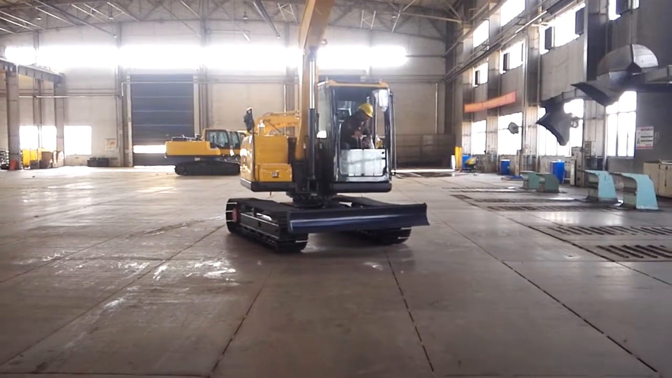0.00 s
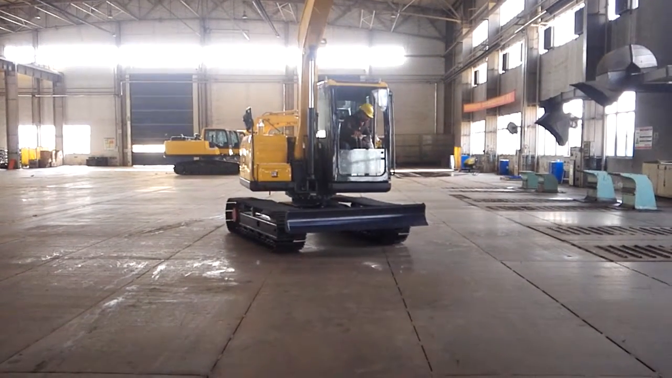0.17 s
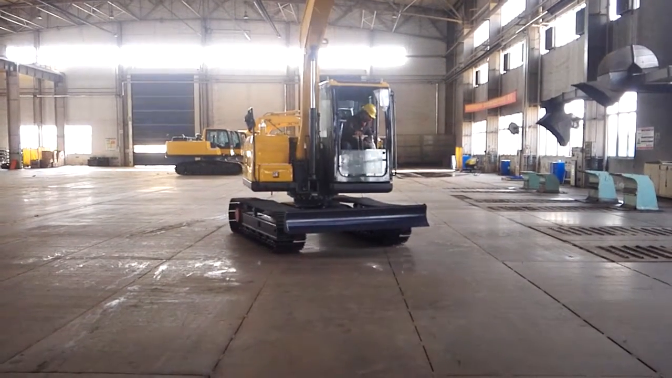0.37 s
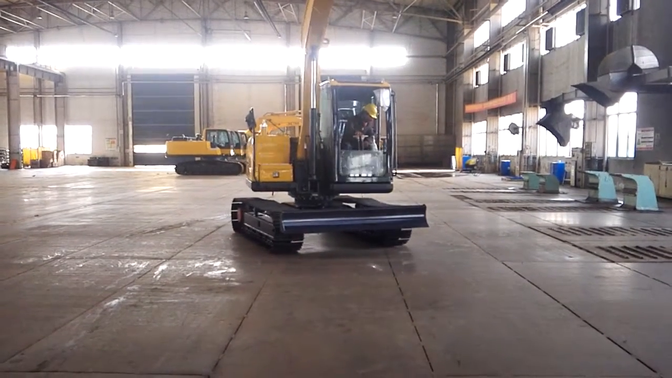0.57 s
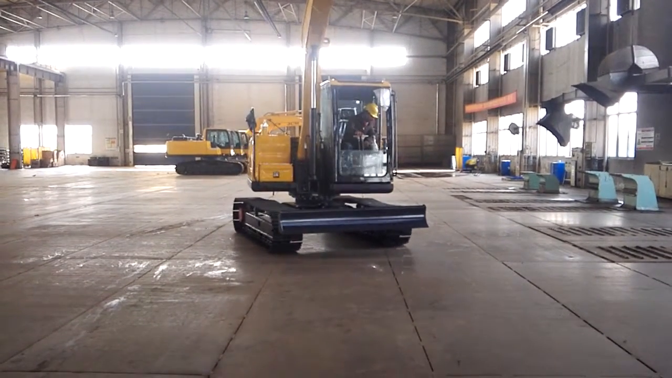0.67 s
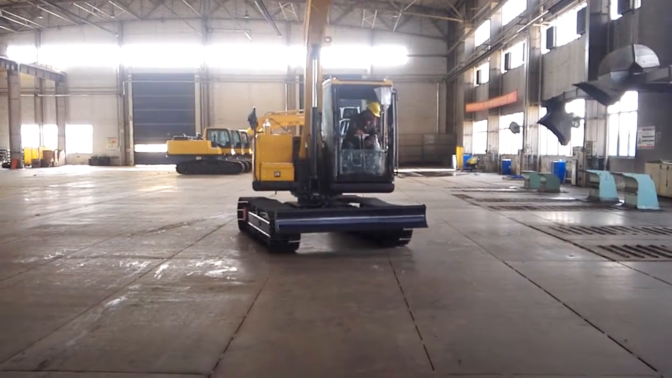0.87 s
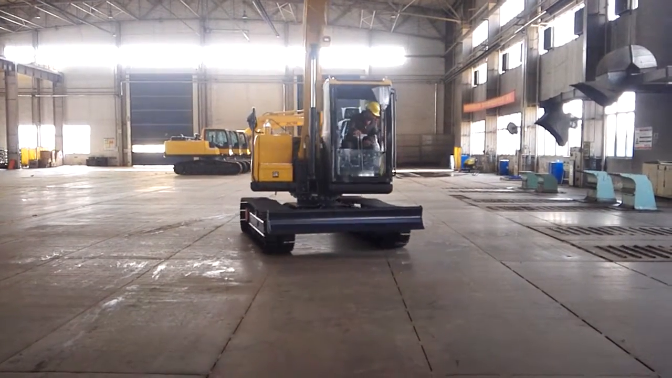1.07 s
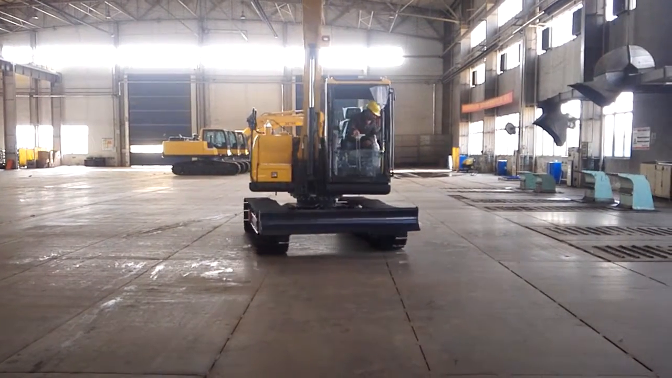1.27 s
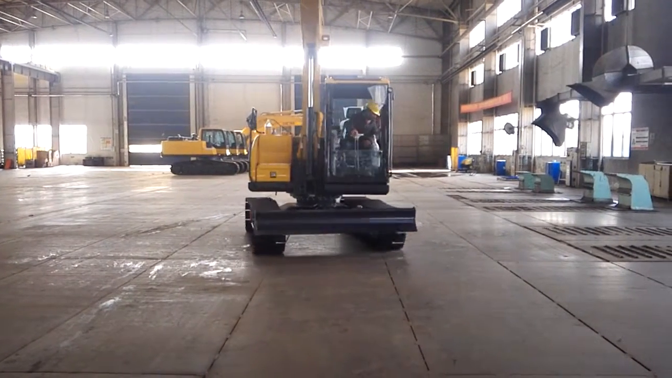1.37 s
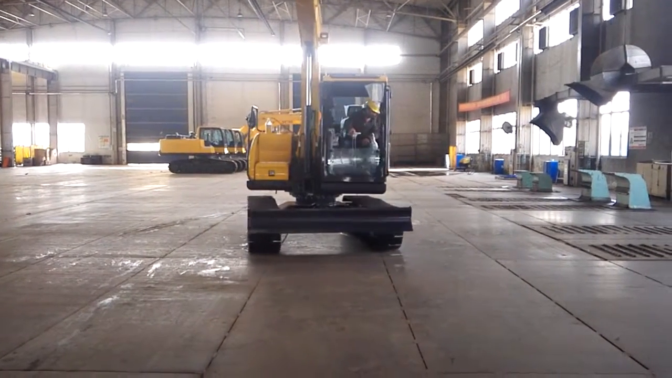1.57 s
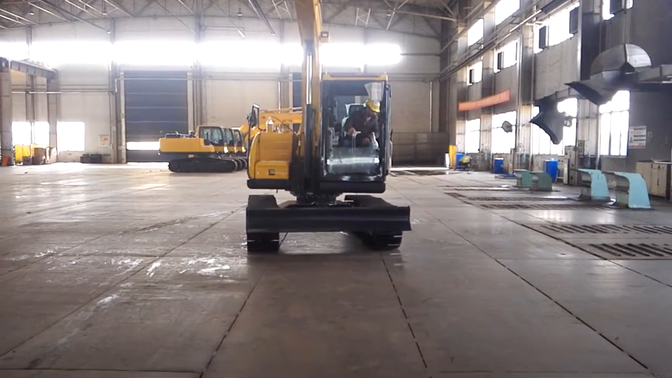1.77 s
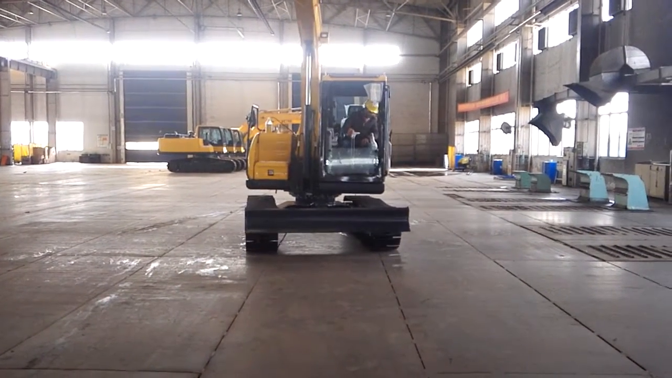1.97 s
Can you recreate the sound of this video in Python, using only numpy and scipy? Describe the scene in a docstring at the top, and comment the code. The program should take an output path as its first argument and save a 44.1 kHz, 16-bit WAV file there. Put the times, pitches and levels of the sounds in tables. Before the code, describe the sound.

Excavator track shoes clank on concrete in a large hall. A faint tick at 0.18 s leads to hard, bright, rattling blows from 0.24 s, loudest near 0.43 and 0.84 s, each chirping downward and ringing. Scraping peaks around 0.5 s, with brief low groans. Weaker clanks continue to 1.5 s, a lighter scrape near 1.3 s; then engine hum, whirr, rumble and echo subside until 2 s.

```python
"""Steel track shoes clank on the concrete floor of a large hall as a small diesel excavator turns.
Each blow is filtered noise whose treble arrives ahead of the mids, so it chirps down, rattles and rings.
Tracks scrape (noise) and the drive groans (a gliding sine); both fade as the engine tones and whirr ease.
Under them lie a rumble and a deep boom. The tracks stand ahead of the hall's diffuse tail,
and the stereo microphone overloads on the loudest peaks."""
import sys
import numpy as np
from scipy import signal
from scipy.fft import rfft, irfft, next_fast_len
from scipy.io import wavfile
from scipy.ndimage import map_coordinates

SR = 44100
rng = np.random.default_rng(int(sys.argv[2]) if len(sys.argv) > 2 else 0)


def unload_audio(sound):
    """Save the sound as a 16-bit wav file, at the path given as the first command line argument."""
    columns = np.transpose(np.atleast_2d(sound))
    # keep every value between -1 and 1, then stretch to whole-number steps
    steps = np.round(np.clip(columns, -1, 1) * 32767)
    wavfile.write(sys.argv[1], SR, steps.astype(np.int16))


N = 88200  # samples: two seconds


def amp(db):
    """Decibels to gain."""
    return 10 ** (np.asarray(db) / 20)


def unit(x):
    """Scale to rms 1."""
    return x / np.sqrt(np.mean(x ** 2) + 1e-20)


def along(points, hz):
    """Read (freq_hz, value) points on a log frequency axis."""
    freq, value = np.transpose(points)
    return np.interp(np.log(hz + 1), np.log(freq + 1), value)


def curve(rows):
    """Read (time_s, value) points, one value per sample."""
    return np.interp(np.arange(N) / SR, *np.transpose(rows))


def wobble(rate, n=N):
    """A smooth random curve around zero, rate knots a second."""
    knots = rng.standard_normal(4000)
    return map_coordinates(knots, [np.arange(n) * rate / SR + 2], mode="wrap")


def filtered(x, response):
    """Multiply the spectrum of x by a complex response of frequency."""
    n = x.shape[-1]
    padded = next_fast_len(n + SR // 10, True)
    return irfft(rfft(x, padded) * response(np.fft.rfftfreq(padded, 1 / SR)), padded)[..., :n]


# likeness of the two microphone channels: freq_hz, correlation
LIKENESS = [(60, 0.97), (190, 1), (370, .6), (700, 0.24), (1200, 0.24), (2200, 0.087), (4000, 0.14),
            (8000, -0.15)]


def spread(pair):
    """Play a pair as mid and side: left and right are most alike in the bass."""
    def mid_side_gains(hz):
        turn = np.arccos(np.clip(along(LIKENESS, hz), -1, 1)) / 2
        return np.array([np.cos(turn), np.sin(turn)])

    mid, side = filtered(pair, mid_side_gains)
    return np.array([mid + side, mid - side])


def rush(spectrum):
    """Stereo noise of rms 1, coloured by a (freq_hz, level_db per Hz) table."""
    noise = rng.standard_normal((2, N))
    return unit(spread(filtered(noise, lambda hz: amp(along(spectrum, hz)))))


# track shoes striking the floor: start_s, level_db, body_db (low), mids_db (upper mids), top_db (treble),
# knock_db, hold_s (rattle), t60_s (rattle), travel_s (of a 1 kHz wave), mid_over_side_db
BLOWS = [(0.179, -40, 13, 7.5, -6, -27, 0.034, 0.16, 0.022, 1.5),
         (0.2397, -9.5, -2, 0, 3, -15.5, .017, 0.16, 0.017, 0.5),
         (0.3198, -12, -1, 2, 0.5, -33, .02, 0.2, 0.016, -1),
         (0.429, -3.5, -3, -1, 6, -12.5, 0.016, 0.2, .022, -1),
         (0.491, -18, -3, 1.5, -2, -24.5, 0.054, 0.17, 0.019, 2),
         (0.653, -14, -3.5, -0.5, 5.5, -21, .02, 0.3, 0.02, 0),
         (.686, -13.5, 1.5, 1, 1, -21.5, 0.022, 0.37, 0.017, 1.5),
         (.801, -15.5, -2, 2.5, 2.5, -20, 0.027, 0.23, .019, 1.5),
         (0.842, -6, -9.5, -4, 3, -10.5, .025, 0.13, .029, 1.5),
         (0.954, -21, -12, 4, 2, -30, 0.018, 0.065, 0.015, -1.5),
         (0.998, -26, 1, -15, 0, -3, 0.0098, 0.119, 0.019, 1),
         (1.108, -17.5, -4, 1, 2, -29, 0.0177, 0.21, .018, -2),
         (1.149, -13.5, -2, 0, 2.5, -7.5, 0.017, 0.33, .022, 1),
         (1.256, -21, -10, 0.5, 0.5, -27.5, 0.021, 0.13, .02, 0),
         (1.308, -21, -1.5, -2.5, -1, -22, .016, 0.19, .02, 0.5),
         (1.38, -35, 2.5, -4.5, -3, -25, 0.031, 0.13, 0.019, -2),
         (1.503, -31.5, -1.5, 2, -3.5, -20, 0.024, 0.19, .02, -0.5)]
# colour of the track steel, heard in blows and scrape: freq_hz, level_db (per Hz, relative)
STEEL_COLOUR = [(40, -41), (150, -7), (400, -15.5), (560, -4.5), (760, 0), (930, -7.5), (1150, -0.5),
                (1600, -0.5), (2150, 0), (2900, -2.5), (4200, 0.5), (5100, 1), (7000, -3.5), (9500, -11),
                (11400, -22.5), (13200, -22), (14500, -52)]
# colour of a blow's knock, a short soft-edged burst in the mids: freq_hz, level_db (per Hz, relative)
KNOCK_COLOUR = [(200, -28), (450, -11.5), (750, 4), (1200, 5), (1700, -9.5), (3000, -4), (8000, -53.5)]
# where the steel lies between the two channels: freq_hz, left_over_right_db
STEEL_BALANCE = [(500, -0.5), (2200, -1.4), (4200, 3), (5500, -2.5), (7500, -4.5), (10000, 0), (12000, 0)]
STRIKE_DB, RING_DB = -12, -20
SHIMMER_DB, SHIMMER_T60_S = -17, 0.5
SAME_SHARE = 0.39  # share of rattle power that all blows have in common
FRONT_DB, FRONT_S = 0.5, 0.017  # extra level at the onset and its decay time
CLATTER_DB, CLATTER_RATE = 1.6, 260  # unevenness at the onset, knots a second
KNOCK_RISE_S, KNOCK_T60_S = 0.007, 0.061


def clanks():
    """Each blow is a strike with a soft-edged knock, a short uneven rattle and the ring of the steel."""
    n = SR // 2
    t = np.arange(n) / SR
    out = np.zeros((2, N + n))  # mid and side until spread
    common = echoes(n)
    shimmer = rng.standard_normal((2, n)) * amp(SHIMMER_DB - 60 * t / SHIMMER_T60_S)
    front = np.exp(-t / FRONT_S)
    halves = np.array([[0.5], [-0.5]])  # split a balance between two channels
    for start, db, body_db, mids_db, top_db, knock_db, hold, t60, travel, mid_over_side_db in BLOWS:
        rattle = np.sqrt(SAME_SHARE) * common + np.sqrt(1 - SAME_SHARE) * echoes(n)
        onset_db = front * (FRONT_DB - CLATTER_DB * wobble(CLATTER_RATE, n))
        rattle = rattle * amp(onset_db - 60 * np.maximum(t - hold, 0) / t60)
        size = np.linalg.norm(rattle[0])
        strike = amp(STRIKE_DB) * size * np.array([[1], [0.3]]) * (t == 0)
        tilt = [(900, body_db), (2300, mids_db), (5000, 0.0019), (10000, top_db)]

        def through_steel(hz):
            colour = unit(amp(along(STEEL_COLOUR, hz)) * ripple(hz))
            return colour * amp(along(tilt, hz)) * bending(hz, travel)

        blow = filtered(rattle + shimmer + strike, through_steel)
        burst = (1 - np.exp(-t / KNOCK_RISE_S)) * amp(-60 * t / KNOCK_T60_S)
        knock = filtered(rng.standard_normal((2, n)) * burst,
                         lambda hz: amp(along(KNOCK_COLOUR, hz)) * bending(hz, travel))
        blow += amp(knock_db) * size * knock / np.linalg.norm(knock[0])
        blow += amp(RING_DB) * ring(t)
        first = round(start * SR)
        out[:, first:first + n] += amp(db + mid_over_side_db * halves) * blow
    return filtered(spread(out[:, :N]), lambda hz: amp(halves * along(STEEL_BALANCE, hz)))


def echoes(n, rate=600):
    """Waves bouncing about in the track: sparse strong returns, rate a second, in a dense wash."""
    sparse = (rng.random((2, n)) < rate / SR) * rng.choice([-1, 1], (2, n))
    return unit(unit(sparse) + 0.71 * rng.standard_normal((2, n)))


FASTEST_HZ, SLOWEST_HZ = 8424, 547.4  # travel time stays constant beyond these


def bending(hz, travel):
    """Phase of a bending wave in steel: its travel time falls with the root of frequency."""
    slowness = np.sqrt(1000 / np.clip(hz, SLOWEST_HZ, FASTEST_HZ))
    delay = travel * (slowness - np.sqrt(1000 / FASTEST_HZ))  # behind the fastest wave
    return np.exp(-2j * np.pi * np.cumsum(delay) * hz[1])  # phase is the sum of delay over frequency


def ripple(hz, depth_db=1.0, spacing_hz=200):
    """Random peaks and dips give every blow its own colour."""
    peaks = rng.standard_normal(256)
    return amp(depth_db * np.interp(hz / spacing_hz, np.arange(256), peaks))


# ringing modes of the track: freq_hz, level_db (before the random change per blow), t60_s
TRACK_MODES = [(727, -10, .55), (1098, -4, .4), (2060, -3, .35), (2166, -3, .35), (2275, -2, .35),
               (3533, -1, .6), (4249, -2, .5), (4531, -2, .4), (4677, -1, .45), (4927, 0, .45),
               (5103, 1, .4), (5533, -3, .45), (5835, -3, .5), (6961, -5, .45)]


def ring(t):
    """Decaying sines at the modes of the track, each a little different from blow to blow."""
    hz, level, t60 = np.transpose(TRACK_MODES)[:, :, None]
    count = len(TRACK_MODES)
    sizes = amp(rng.normal(0, 4.5, (2, count))) * rng.choice([-1, 1], (2, count))
    tones = amp(level - 60 * t / t60) * np.sin(2 * np.pi * (hz * t + rng.random(hz.shape)))
    return sizes @ tones / np.sqrt(count) * (1 - np.exp(-t / 0.004))  # 4 ms rise


# shoes grinding over the floor: time_s, level_db
SCRAPE_LEVEL = [(0, -45), (.15, -43.5), (.21, -33), (.5, -22.5), (.95, -39), (1.07, -44), (1.3, -30.5),
                (1.6, -48), (2, -80.5)]


def scrape(grit_db=3):
    """The shoes grind sideways over the concrete: steel-coloured noise, roughened by small slips."""
    slips = amp(grit_db * wobble(250) + 0.67 * wobble(22))
    return amp(curve(SCRAPE_LEVEL)) * unit(rush(STEEL_COLOUR) * slips)


# drone of the track drive: time_s, pitch_hz (before waver), level_db
DRIVE_GROAN = [(0, 158.6, -48), (.2, 160.3, -45), (.27, 150, -38.5), (.36, 141.4, -27), (.42, 138, -49),
               (.62, 151, -40), (.7, 149.9, -38), (.88, 134.4, -49), (1.02, 138.7, -67), (1.15, 137.7, -35),
               (1.25, 137.6, -55), (2, 135, -62)]


def groan(waver=0.03):
    """The track drive groans low: one sine with a gliding, wavering pitch."""
    times, hz, db = np.transpose(DRIVE_GROAN)
    pitch = curve(np.c_[times, hz]) * (1 + waver * wobble(40))
    phase = 2 * np.pi * np.cumsum(pitch) / SR
    return np.sqrt(2) * amp(curve(np.c_[times, db])) * np.sin(phase)


# exhaust tones: order (multiple of shaft speed), level_db (rms, before roughness and effort)
EXHAUST_ORDERS = [(1, -72), (2, -59.5), (3, -50), (4, -58), (6, -50), (7, -65)]
# fan and hydraulics: freq_hz, level_db (per Hz, relative)
WHIRR_COLOUR = [(180, -32), (300, -2), (580, -2.5), (649, -6), (726, -3.5), (1180, -5.5), (1600, -5),
                (1790, -11.5), (2590, -18.5), (3630, -20.5), (14000, -50.5)]
# how hard the engine works: time_s, level_db (added to tones and whirr)
ENGINE_EFFORT = [(0, 1), (.6, 3.5), (1.1, -3.5), (1.5, -5), (2, -6)]
SHAFT_HZ = 37.8  # mean shaft speed
WHIRR_DB, FIRING_DEPTH = -34.5, 0.18  # whirr level before effort, depth of its pulsing


def engine(drift=0.012, rough_db=3):
    """Exhaust tones on the shaft orders, with fan and hydraulic noise pulsing at the firing rate."""
    turns = 2 * np.pi * np.cumsum(SHAFT_HZ * (1 + drift * wobble(28))) / SR
    tones = np.zeros(N)
    for order, db in EXHAUST_ORDERS:
        level = np.sqrt(2) * amp(db + rough_db * wobble(14))
        tones += level * np.sin(order * turns + 2 * np.pi * rng.random())
    firing = 1 + FIRING_DEPTH * np.sin(2 * turns)  # two firings a turn
    whirr = amp(WHIRR_DB) * rush(WHIRR_COLOUR) * firing
    return amp(curve(ENGINE_EFFORT)) * (tones + whirr)


# colour of the rolling undercarriage: freq_hz, level_db (per Hz, relative)
RUMBLE_COLOUR = [(20, -36), (60, -15), (90, 2), (140, 3.5), (200, 1.5), (270, 2.5), (400, -16.5),
                 (800, -48), (2000, -67)]
# its loudness: time_s, level_db
ROLLING_LEVEL = [(0, -37), (.2, -37.5), (.27, -33.5), (.46, -30), (.62, -42.5), (.72, -32), (.86, -35),
                 (1.07, -43), (1.19, -35), (1.28, -42.5), (1.55, -42.5), (1.75, -50.5), (2, -49)]
# colour of the deep boom: freq_hz, level_db (per Hz, relative)
BOOM_COLOUR = [(15, -19), (30, -17), (45, -3), (58, -18), (80, -10), (130, -18), (400, -70)]
# its loudness: time_s, level_db
DEEP_LEVEL = [(0, -39), (.15, -48), (.3, -57), (.45, -45.5), (.7, -54), (.87, -51.5), (1.0, -56),
              (2, -58.5)]


def rumble(shudder_db=1.55, shudder_rate=30):
    """The undercarriage shudders as it rolls, over a deep boom of the whole machine: two bass noises."""
    uneven = amp(shudder_db * wobble(shudder_rate))
    shudder = amp(curve(ROLLING_LEVEL)) * unit(rush(RUMBLE_COLOUR) * uneven)
    return shudder + amp(curve(DEEP_LEVEL)) * rush(BOOM_COLOUR)


# how long the hall rings: freq_hz, t60_s
HALL_DECAY = [(100, 2), (1000, 5), (2000, 2.77), (4500, 1.25), (8000, 1.07), (13000, 0.83)]
# colour of its tail: freq_hz, level_db (relative)
TAIL_COLOUR = [(100, 3), (1000, -1), (2200, 3.5), (5000, 1.5), (10000, -0.5)]
HALL_DB, HALL_BUILD_S = -10, 0.01


def hall(x):
    """A long diffuse tail of fading noise: longest near 1 kHz, shorter towards the treble."""
    hz, t, noise = signal.stft(rng.standard_normal((2, N)), SR, nperseg=256)
    decay_db = 60 * t / along(HALL_DECAY, hz)[:, None]
    fade = amp(along(TAIL_COLOUR, hz)[:, None] - decay_db) * (1 - np.exp(-t / HALL_BUILD_S))
    tail = spread(signal.istft(noise * fade, SR, nperseg=256)[1][:, :N])
    return signal.fftconvolve(x, tail / np.linalg.norm(tail[0]), axes=1)[:, :N]


def scene():
    """Tracks with their hall tail, then groan, engine and rumble without it."""
    tracks = clanks() + scrape()
    return tracks + amp(HALL_DB) * hall(tracks) + groan() + engine() + rumble()


def record(dry, top_hz=14200):
    """The microphone overloads on the loudest peaks and keeps nothing above its band limit."""
    clipped = dry / (1 + np.abs(dry) ** 8) ** (1 / 8)
    return filtered(clipped, lambda hz: hz < top_hz)


dry = scene()
out = record(dry)
unload_audio(out)
```